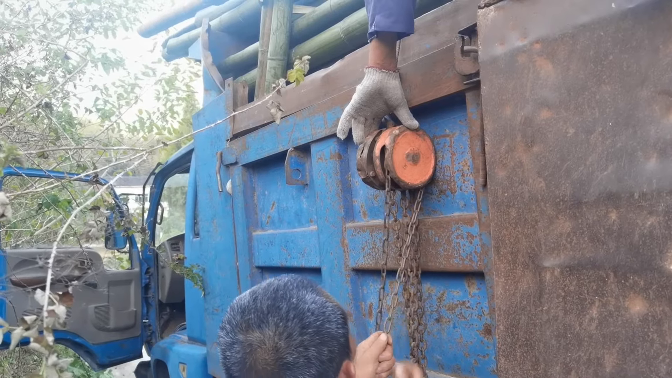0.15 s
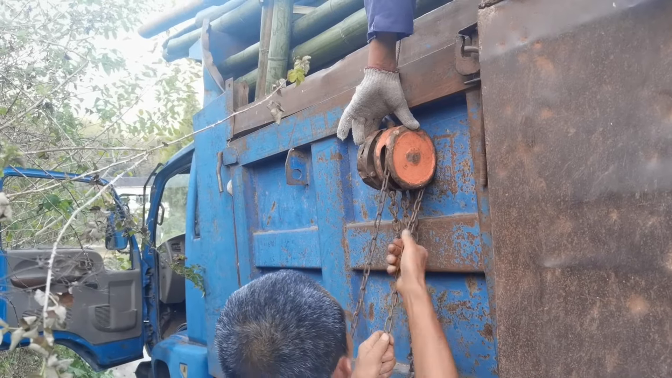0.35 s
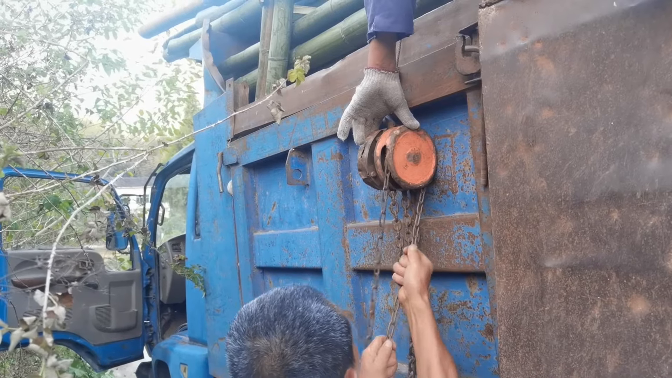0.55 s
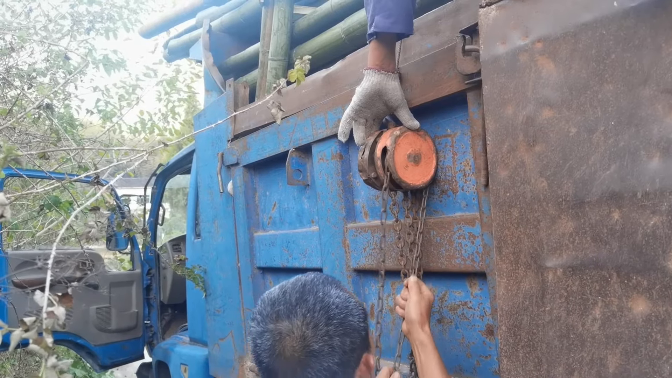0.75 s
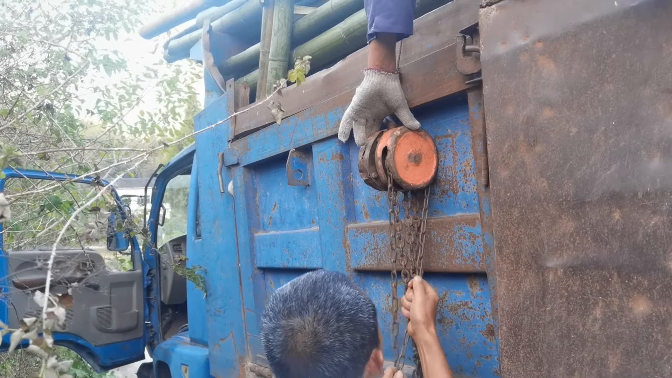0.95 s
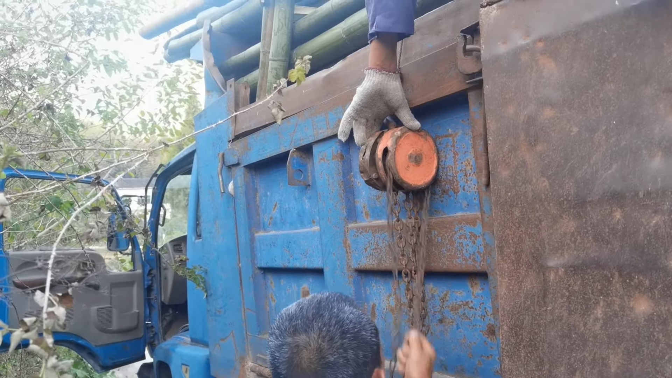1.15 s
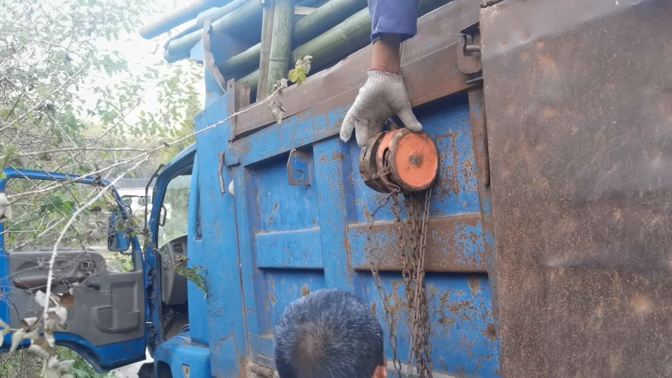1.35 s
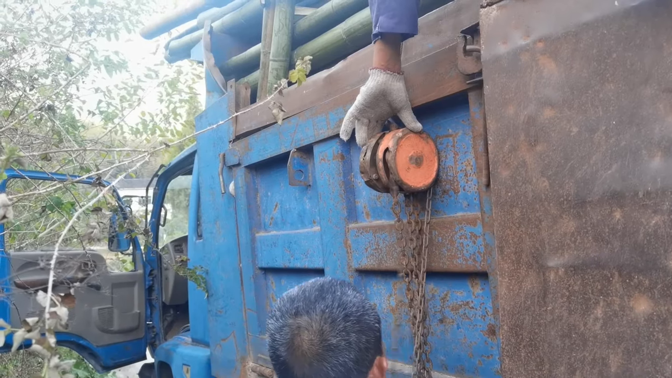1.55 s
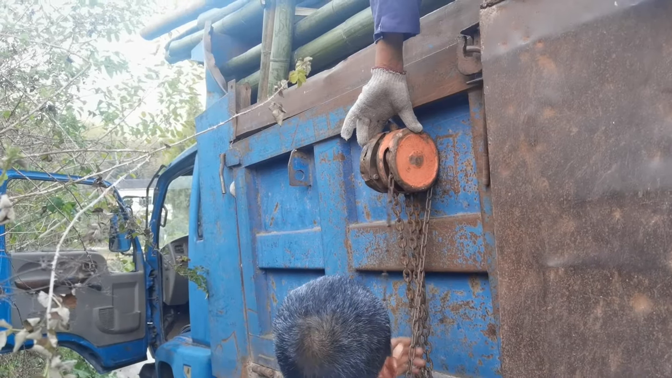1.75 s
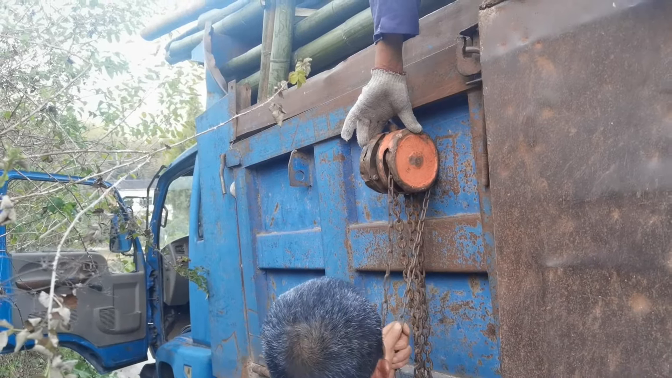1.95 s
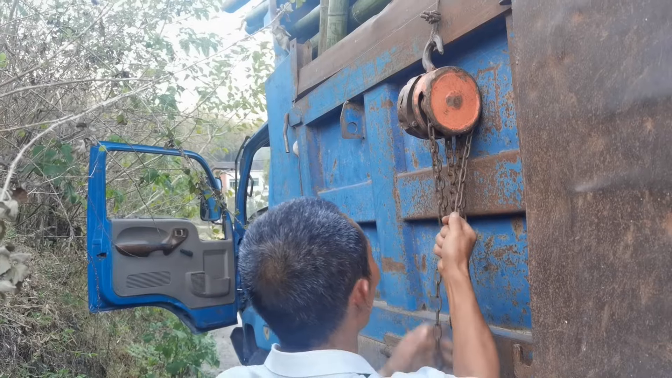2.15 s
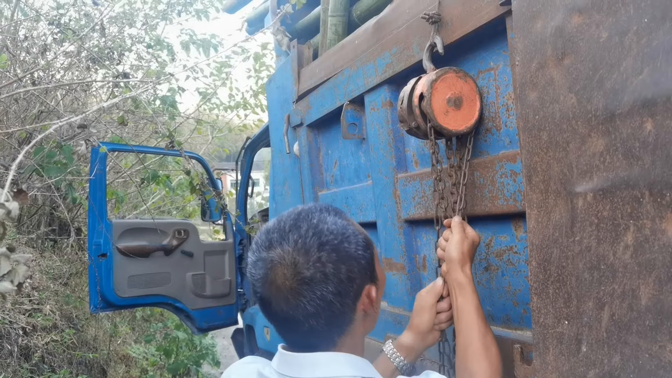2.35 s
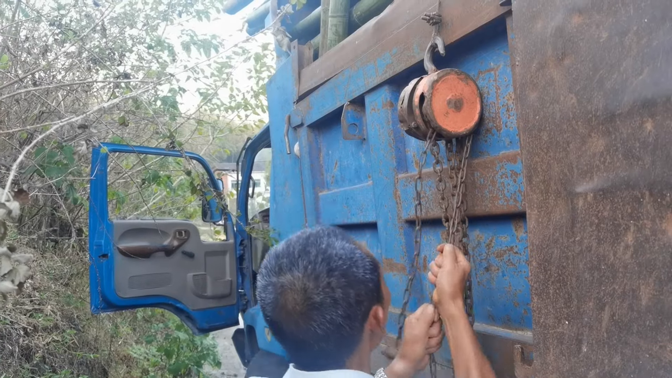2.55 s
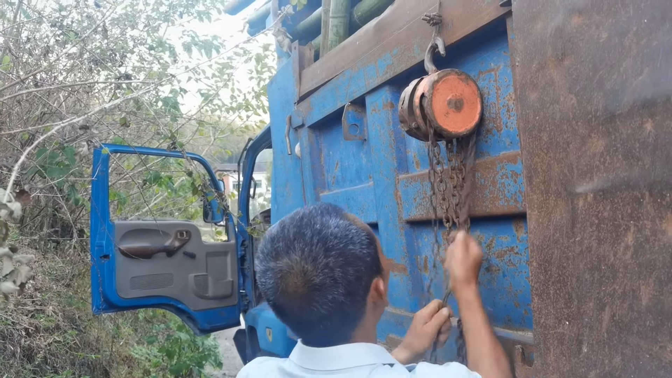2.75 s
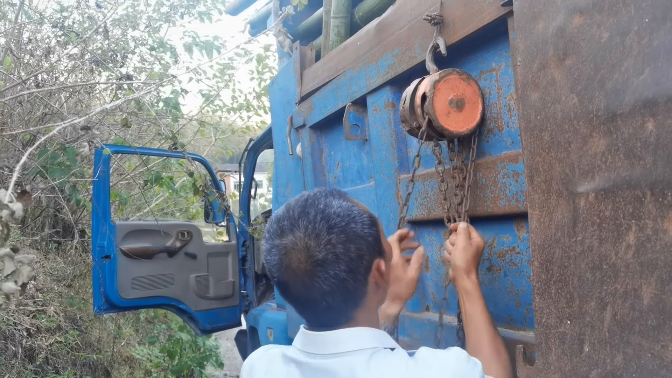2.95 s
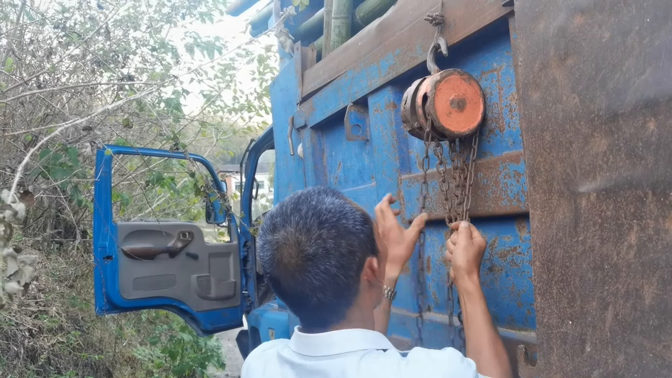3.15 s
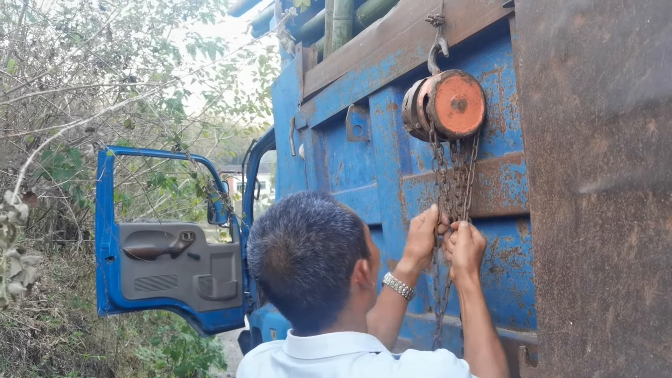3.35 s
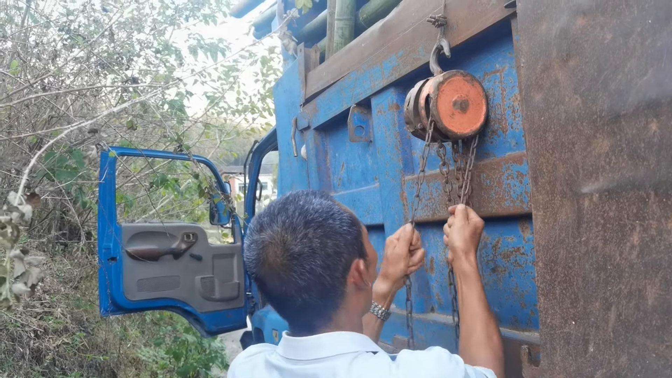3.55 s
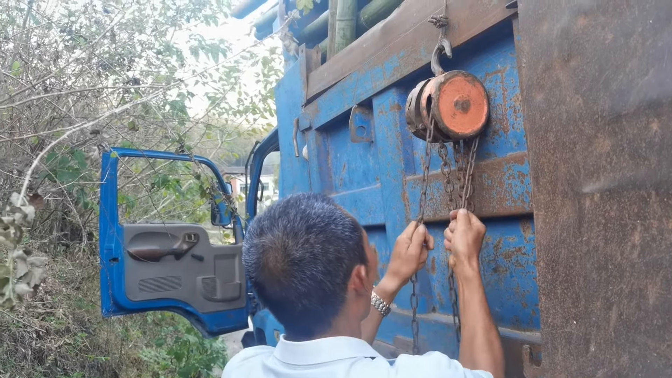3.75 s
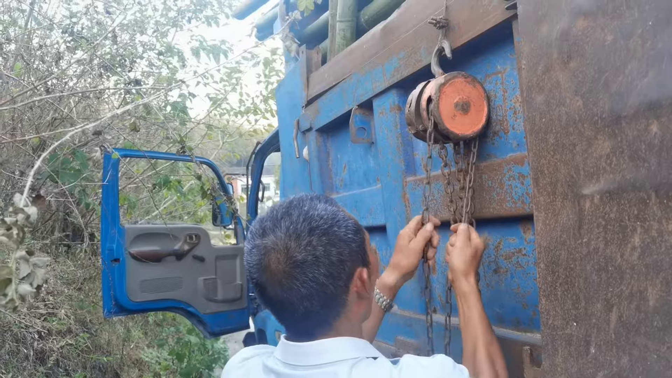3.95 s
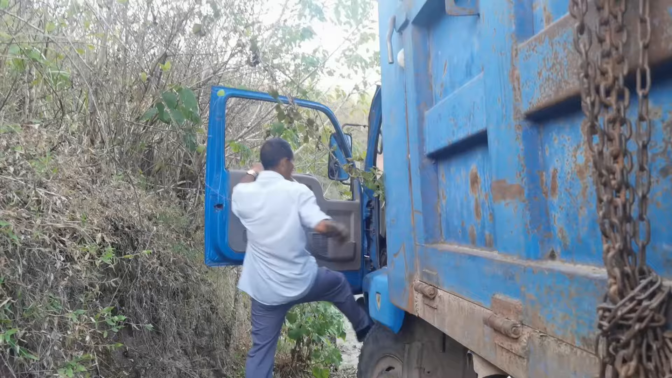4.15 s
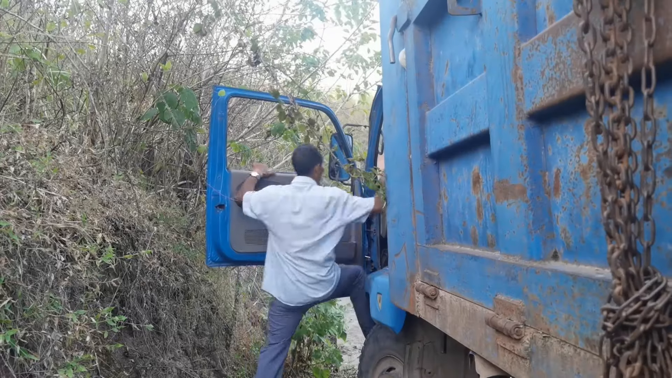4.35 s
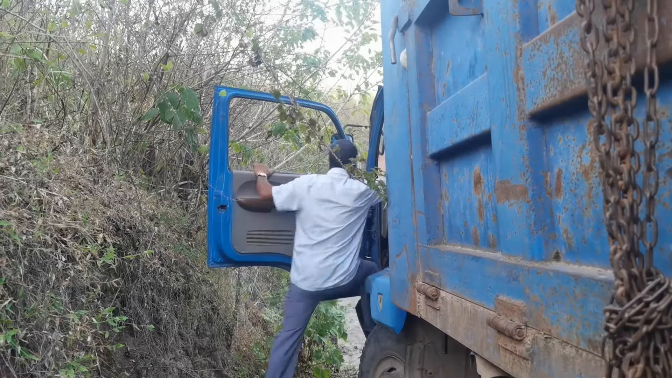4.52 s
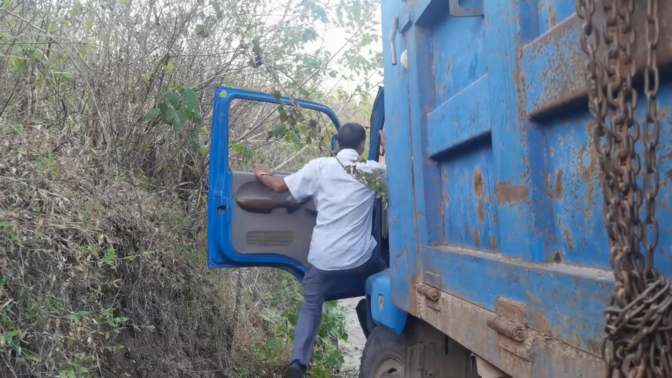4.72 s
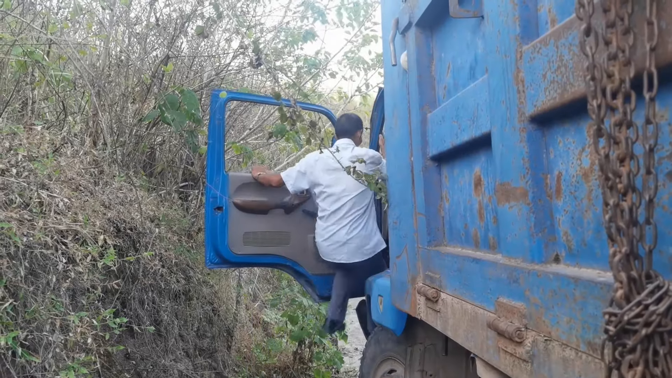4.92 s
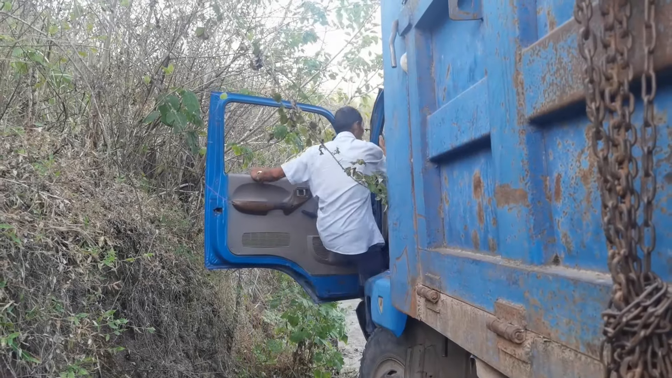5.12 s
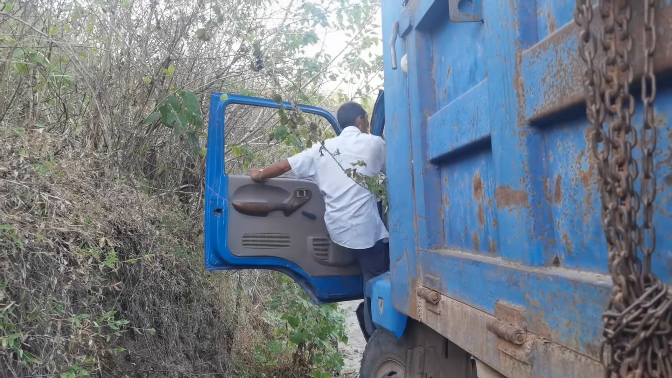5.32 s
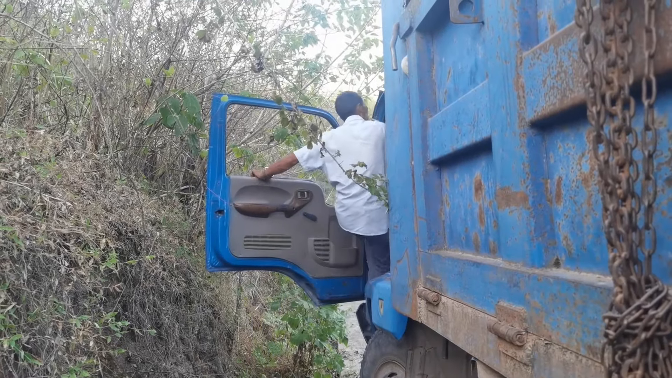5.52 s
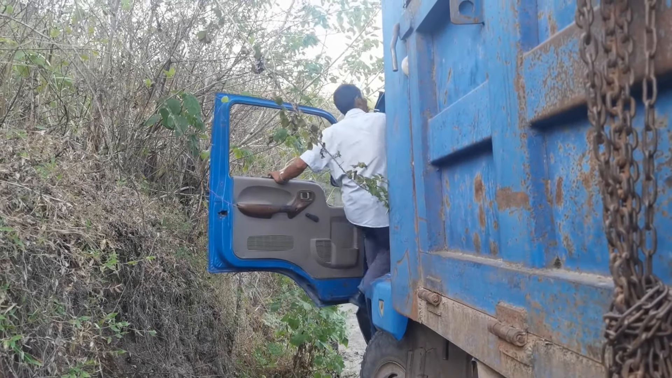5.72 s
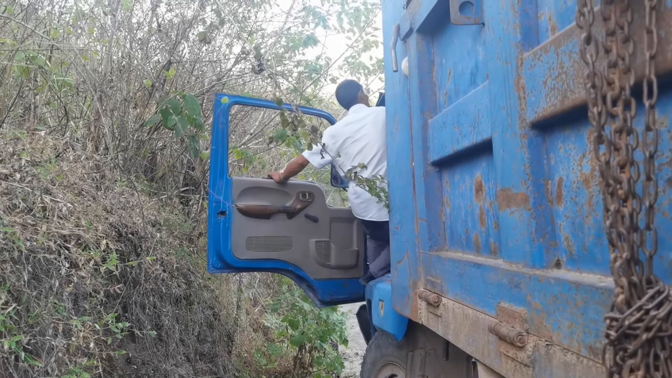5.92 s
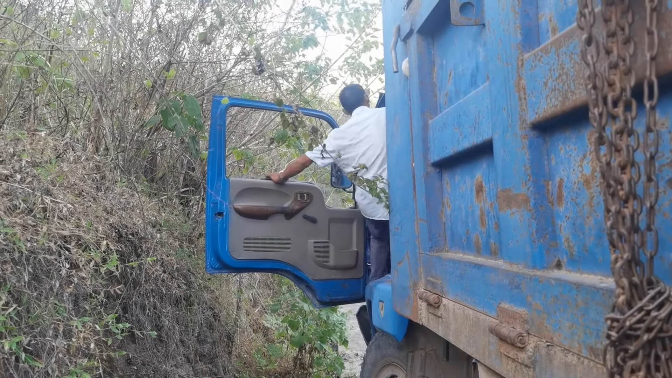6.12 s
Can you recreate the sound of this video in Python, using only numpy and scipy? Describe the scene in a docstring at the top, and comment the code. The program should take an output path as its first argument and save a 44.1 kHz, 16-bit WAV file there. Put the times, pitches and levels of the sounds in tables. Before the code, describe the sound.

Quiet outdoor air with a faint, very thin high hiss until about 4.2 s. Close by, a hand hoist starts nearly still; light link clicks come at 0.3 s, then a sharp bright clank at 0.6. From 1.0 to 1.25 s a dense, loud cascade of steel links rings and chatters, with housing clacks and a low boom from the truck side, trailing off in clinks to 1.5. Smaller clinks follow around 1.7 and 1.9, a strong clank with boom at 2.43, another at 2.74, then a cluster at 3.4 with a clear high link tick, and a last clink near 3.8. Silence at 4.2. From 4.3 a quieter scene: leaves rustle, shoes scuff, soft low thuds on the cab, firmest at 4.57, with a short squeak at 4.5. A thud at 4.8, twig tick at 4.9, raspy chirp at 4.94, faint squeaks at 5.24, then sparse, muted bumps and rustle to about 6.2.

```python
"""A hand chain hoist is hauled in several pulls against the steel side of a truck, in quiet air; a faint, very high
thin hiss runs through the first part. Link contacts ring shared steel modes, the housing clacks in its own and the
side wall booms in low modes. One link tick rings clear and high near the end of the hauling.
After a brief silence a man climbs into the cab through roadside brush: filtered contact noise rustles and scuffs,
cab modes thud, twigs tick, and wavering tones in rasp squeak and chirp."""
import sys
import numpy as np
from scipy import signal
from scipy.fft import rfft, irfft, next_fast_len
from scipy.io import wavfile
from scipy.ndimage import uniform_filter1d

SR = 44100
rng = np.random.default_rng(int(sys.argv[2]) if len(sys.argv) > 2 else 0)


def output_pcm(signal):
    """Save a mono or channel-first signal as 16-bit PCM at the path in sys.argv[1].

    Samples are clipped to [-1, 1] before scaling.
    """
    pcm = np.clip(np.atleast_2d(signal).T, -1, 1) * 32767
    wavfile.write(sys.argv[1], SR, np.round(pcm).astype(np.int16))


N = 272538


def amp(db):
    """dB to amplitude factor."""
    return 10 ** (np.asarray(db) / 20)


def unit(x):
    """Scale to rms 1."""
    return x / np.sqrt(np.mean(x ** 2) + 1e-20)


def along(points, hz):
    """Interpolate (frequency [Hz], value) points on a log frequency axis."""
    f, value = np.transpose(points)
    return np.interp(np.log(hz + 1), np.log(f + 1), value)


def curves(rows):
    """One value per sample for each column after the time [s]."""
    s, *columns = np.transpose(rows)
    return [np.interp(np.arange(N) / SR, s, column) for column in columns]


def add(track, s, sound):
    """Mix a sound into the track at time s."""
    start = max(round(s * SR), 0)
    part = track[:, start:start + sound.shape[-1]]
    part += sound[..., :part.shape[-1]]


def filtered(x, response):
    """Apply a response of frequency, zero-padded."""
    n = x.shape[-1]
    m = next_fast_len(n + n // 4, True)
    spectrum = rfft(x, m) * response(np.fft.rfftfreq(m, 1 / SR))
    return irfft(spectrum, m)[..., :n]


def coloured(x, spectrum):
    """Shape x by (frequency [Hz], level [dB]) points."""
    return filtered(x, lambda hz: amp(along(spectrum, hz)))


def resonances(modes, f, scatter_db=0):
    """Causal response of (frequency [Hz], width [Hz], level [dB]) modes, signs alternating, strengths scattered."""
    total = 0
    for k, (centre, width, db) in enumerate(modes):
        strength = (-1) ** k * amp(db + scatter_db * rng.standard_normal())
        damping = 1j * f * width
        total = total + strength * damping / (centre * centre - f * f + damping)
    return total


def noise():
    """White noise, two unrelated channels."""
    return rng.standard_normal((2, N))


def stereo(pair, alike):
    """Turn two unrelated signals into left and right with a given likeness, at rms 1."""
    def mid_side(hz):
        turn = np.arccos(np.clip(along(alike, hz), -1, 1)) / 2
        return np.array([np.cos(turn), np.sin(turn)])

    mid, side = filtered(pair, mid_side)
    return unit(np.array([mid + side, mid - side]))


def contacts(rate_hz, spread_db, t30_s):
    """Rms-1 envelope of random small contacts; each one's energy falls 30 dB in t30_s."""
    hits = rng.random(N) < rate_hz / SR
    energy = hits * amp(spread_db * np.clip(rng.standard_normal(N), -2, 2)) ** 2
    t = np.arange(SR // 4) / SR
    energy_fall = 10 ** (-3 * t / t30_s)
    return unit(np.sqrt(np.abs(signal.fftconvolve(energy, energy_fall)[:N])))


def patchy(x, depth_db):
    """Shift the colour from moment to moment as the points of contact change."""
    z = signal.stft(x, nperseg=512)[2]
    field = uniform_filter1d(rng.standard_normal(z.shape[1:]), size=3, axis=0)
    field = uniform_filter1d(field, size=8, axis=1)
    return signal.istft(z * amp(depth_db * unit(field)), nperseg=512)[1][:, :N]


def strokes(starts, lengths, levels_db, shape):
    """Envelope of strokes added in power: each swells, holds, falls away and lingers faintly."""
    delay_s, attack_t60_s, release_t60_s, linger_db, linger_t60_s = shape
    t, power = np.arange(0, N, 32) / SR, 0
    for s, length, db in zip(starts, lengths, levels_db):
        before = np.maximum(s + delay_s - t, 0)
        after = np.maximum(t - s - delay_s - length, 0)
        release = amp(-60 * after / release_t60_s)
        linger = amp(linger_db - 60 * after / linger_t60_s)
        power = power + (amp(db - 60 * before / attack_t60_s) * np.maximum(release, linger)) ** 2
    return np.interp(np.arange(N) / SR, t, np.sqrt(power))


# outdoor air: (frequency [Hz], relative level [dB])
AIR_SPECTRUM = [(25, -24.5), (60, -2.5), (170, -11.5), (400, -17), (700, -12), (1500, -28), (3200, -27),
                (6000, -23), (10000, -20), (13000, -41.5), (16000, -39.5)]
# faint, very high thin hiss: (frequency [Hz], relative level [dB])
HISS_SPECTRUM = [(13500, -47), (14700, -22), (15200, -1), (15600, -16), (16000, -17.5)]
# air and cab: (frequency [Hz], left-right likeness [-1 to 1])
FAR_LIKENESS = [(100, 1), (300, 0.94), (650, 0.25), (1400, 0), (3000, 0.6), (12000, 0)]


def background(first_part, air_db=-69, hiss_db=-56):
    """Quiet outdoor air as filtered noise; a faint, very high thin hiss runs through the first part."""
    air = amp(air_db) * stereo(coloured(noise(), AIR_SPECTRUM), FAR_LIKENESS)
    waver = contacts(rate_hz=30, spread_db=3, t30_s=.4)
    hiss = amp(hiss_db) * waver * unit(coloured(noise(), HISS_SPECTRUM))
    return air + first_part * hiss * amp([[2], [-2]])


# chain pulls: (time [s], length [s], link jingle relative level [dB], housing clatter relative level [dB])
CHAIN_PULLS = [(0.0, 0.015, -49, -59), (0.556, 0.032, -31.5, -37.5), (1.008, .05, -34, -54),
               (1.082, .15, -19.5, -26.5), (1.572, 0.03, -40, -52), (1.896, 0.012, -44, -58.5),
               (1.99, 0.022, -53, -57), (2.147, 0.44, -64.5, -63.5), (2.417, 0.055, -25, -34),
               (2.743, 0.021, -31.5, -41), (3.437, 0.024, -38, -39), (3.772, 0.03, -46.5, -36.5)]
# envelopes: (delay [s], attack t60 [s], release t60 [s], lingering share [dB], lingering t60 [s])
JINGLE_ENVELOPE = (0, 0.1356, 0.2274, -23, 1.84)
CLATTER_ENVELOPE = (0.05, 0.3567, 0.2264, -20, 1.52)
# modes of links, then of hoist housing: (frequency [Hz], width [Hz], relative level [dB])
LINK_MODES = [(2248, 78, -10), (2920, 150, -14), (3310, 77, -12.5), (4250, 97, -5), (4640, 46, -1.5),
              (5284, 100, 3.5), (5630, 80, 0.5), (6042, 70, 6), (6800, 120, -10.5), (8235, 160, -1.5),
              (10020, 46, -14.5)]
HOUSING_MODES = [(564, 64, -6.5), (672.4, 62, 3.5), (804, 100, -3.5), (892.4, 36, 0), (1013, 37, -4.5),
                 (1223, 110, -9), (1405, 57, -5), (1866, 33, -9.5), (2087, 62, -16.5), (2766, 80, -11),
                 (3357, 66, -16)]
# bare crack of steel on steel: (frequency [Hz], relative level [dB])
CRACK_SPECTRUM = [(300, -33), (1200, -0.5), (2000, 2), (3500, 1.5), (5500, 3), (8400, 2), (9400, -10),
                  (11000, -10.5), (12000, -22), (14600, -10.5), (15400, -21.5)]
# hoist: (frequency [Hz], left-right likeness [-1 to 1])
NEAR_LIKENESS = [(100, .97), (300, .94), (600, .9), (1200, .65), (2200, .25), (5000, .5), (12000, .4)]


def running_chain(jingle_db=1, clatter_db=0, crack_db=-8):
    """Many lesser link contacts during a pull ring chain and housing together."""
    s, length, jingle, clatter = np.transpose(CHAIN_PULLS)
    touches = stereo(noise(), NEAR_LIKENESS) * contacts(rate_hz=650, spread_db=2.5, t30_s=.02)
    links = filtered(touches, lambda f: resonances(LINK_MODES, f) + amp(crack_db + along(CRACK_SPECTRUM, f)))
    links = unit(patchy(links, depth_db=4.0))
    housing = unit(filtered(touches, lambda f: resonances(HOUSING_MODES, f)))
    jingle_level = strokes(s, length, jingle + jingle_db, JINGLE_ENVELOPE)
    clatter_level = strokes(s, length, clatter + clatter_db, CLATTER_ENVELOPE)
    return jingle_level * links + clatter_level * housing


# jolts of the hoist against the side wall: (time [s], level [dB])
WALL_JOLTS = [(0.0, -53.5), (0.59, -37.5), (0.987, -35.5), (1.11, -22.5), (1.191, -24.5), (1.24, -26),
              (1.47, -49.5), (1.67, -49), (1.95, -51.5), (2.334, -46), (2.439, -26.5), (2.74, -34.5),
              (2.81, -37), (3.439, -39.5), (3.48, -42), (3.554, -33.5), (3.79, -35)]
# envelope: (delay [s], attack t60 [s], release t60 [s], lingering share [dB], lingering t60 [s])
BOOM_ENVELOPE = (0, .05, .4, -12, 1.4)
# side wall modes: (frequency [Hz], width [Hz], relative level [dB])
WALL_MODES = [(58, 29, -13.5), (80.5, 9, -2), (111, 20, -1), (144, 21, 4), (175, 16, 2.5), (202.2, 22, -1),
              (275.4, 29, -3), (331, 40, -7.5), (401.3, 110, -11.5)]


def side_wall(wall_db=0, stir_db=-67, settle_s=0.015, jolt_s=.025):
    """Noise-driven low modes of the steel panel, levelled: a faint stir, and a boom at each jolt of the hoist."""
    s, boom = np.transpose(WALL_JOLTS)
    ring = filtered(stereo(noise(), NEAR_LIKENESS), lambda f: resonances(WALL_MODES, f))
    power = uniform_filter1d(np.mean(ring ** 2, axis=0), int(settle_s * SR))
    swell = np.sqrt(np.abs(power) + 1e-12)
    boom_level = strokes(s, np.full(len(s), jolt_s), boom + wall_db, BOOM_ENVELOPE)
    return np.hypot(amp(stir_db), boom_level) * ring / swell


def link_ring(x, note_hz, tilt_db, crack_db=-18, own_db=-4, note_db=-1, note_width_hz=110,
              own_width_hz=60, scatter_db=3.5, count=26):
    """Links share main modes; each blow adds its note, lesser random modes, a crack and a tilt [dB/octave]."""
    stretch = np.exp(.005 * rng.standard_normal())
    own = [(hz, own_width_hz, own_db + along(CRACK_SPECTRUM, hz))
           for hz in np.sort(rng.uniform(2300, 14000, count))]

    def response(f):
        tilt = amp(tilt_db * np.log2(np.clip(f, 1000, 12000) / 5000))
        body = resonances(LINK_MODES, f * stretch, scatter_db) + resonances(own, f, scatter_db)
        body = body + amp(crack_db + along(CRACK_SPECTRUM, f))
        return tilt * body + 1j * resonances([(note_hz, note_width_hz, note_db)], f)

    return filtered(x, response)


# link blows: (time [s], link relative level [dB], housing clack relative level [dB], link note [Hz])
LINK_BLOWS = [(0.3426, -31.5, -49.5, 6020), (0.4219, -41, -56.5, 5500), (0.5546, -21, -29.5, 6360),
              (0.5945, -5, -31, 5360), (0.6344, -21.5, -47.5, 6040), (0.7078, -31.5, -55, 5600),
              (0.7482, -39.5, -51.5, 2790), (0.8154, -50, -52, 2780), (0.8634, -44.5, -47, 3285),
              (0.9284, -68, -50, 7170), (0.9784, -21.5, -40, 6920), (0.9986, -17, -38.5, 5490),
              (1.0585, -6, -27.5, 8090), (1.0794, -6, -23, 5400), (1.0974, -5, -20.5, 5330),
              (1.1164, -6, -19, 6010), (1.1314, -9, -27.5, 5390), (1.1593, -4, -20.5, 6020),
              (1.1864, -6, -18.5, 6000), (1.2064, -5, -22.5, 8140), (1.2254, -10.5, -23.5, 6040),
              (1.2684, -19.5, -42, 5430), (1.3079, -21.5, -38.5, 5410), (1.3783, -29.5, -42, 5390),
              (1.4207, -17, -38, 6240), (1.4641, -12, -32.5, 5360), (1.6322, -27.5, -43.5, 6840),
              (1.6691, -18.5, -37, 6850), (1.6864, -23, -40.5, 7000), (1.7579, -27.5, -45.5, 6120),
              (1.8264, -42.5, -53, 5380), (1.8841, -31.5, -45, 2810), (1.916, -24, -45.5, 6260),
              (1.9719, -31, -68, 4830), (2.0722, -43.5, -55, 3270), (2.2937, -45, -43, 3200),
              (2.4204, -6.5, -29, 6350), (2.4384, -14.5, -27, 5175), (2.4603, -25, -30, 8370),
              (2.4956, -27, -34.5, 5450), (2.6663, -25.5, -47, 3260), (2.7337, -17, -32, 5400),
              (2.7437, -15.5, -31.5, 6230), (2.8559, -33.5, -51.5, 3310), (2.9352, -30, -42.5, 3220),
              (3.039, -41.5, -48.5, 2480), (3.1577, -32, -49, 3530), (3.4116, -18, -46, 4580),
              (3.4371, -16, -38, 5510), (3.4496, -13, -33.5, 6720), (3.4694, -17, -39.5, 3250),
              (3.5259, -32, -68, 5350), (3.5998, -54, -49.5, 2700), (3.7908, -19.5, -38.5, 5580),
              (3.8594, -40, -46, 3280), (3.8761, -36, -63, 6260), (4.0452, -32, -47.5, 6140)]
# harder blows are brighter: dB per octave for each dB above a plain blow
BRIGHTEN, PLAIN_DB = .2, -20.5


def clanks(link_db=-9, clack_db=-1, tail_db=-29, tail_t60_s=0.28, snap_db=2.0, snap_t60_s=0.0043,
           chatter_t60_s=0.083, slide_db=-25, clack_t60_s=0.11, kick_db=6, lag_s=0.001):
    """A link slides, snaps into its pocket and chatters; the housing modes answer a moment later."""
    links, clacks = np.zeros((2, N)), np.zeros((2, N))
    t = np.arange(-SR // 30, SR // 5) / SR

    def fade(t60_s):
        return (t >= 0) * amp(-60 * np.abs(t) / t60_s)

    def early_rms(x, window_s):
        return np.sqrt(np.mean(x[:, (t >= 0) & (t < window_s)] ** 2))

    slide = (t < 0) * (1 - t / t[0]) ** 2  # friction swells up to the blow
    around = amp(tail_db) * fade(tail_t60_s) + amp(slide_db) * slide
    hiss = stereo(noise(), NEAR_LIKENESS)
    bounces = contacts(rate_hz=1000, spread_db=3.5, t30_s=.009)
    for s, db, housing_db, note_hz in LINK_BLOWS:
        part = rng.integers(N - len(t)) + np.arange(len(t))
        snap = fade(snap_t60_s)
        blow = hiss[:, part] * (amp(snap_db) * snap + bounces[part] * fade(chatter_t60_s) + around)
        ring = link_ring(blow, note_hz, tilt_db=BRIGHTEN * (db - PLAIN_DB))
        add(links, s + t[0], amp(db + link_db) * ring / early_rms(ring, .012))
        push = hiss[:, part] * (amp(kick_db) * snap + fade(clack_t60_s) + around)
        knock = filtered(push, lambda f: resonances(HOUSING_MODES, f, scatter_db=4))
        add(clacks, s + t[0] + lag_s, amp(housing_db + clack_db) * knock / early_rms(knock, .025))
    return links + clacks


# first row a high link tick, the rest squeaks and chirps:
# (time of peak [s], level [dB], pitch [Hz], half length [s], rasp share [0-1])
TICK_AND_SQUEAKS = [(3.41, -35, 4620, 0.007, .55), (4.503, -31, 1741, 0.012, .03),
                    (4.94, -23, 3860, 0.016, 0.6), (5.01, -53, 1170, 0.02, 0.2),
                    (5.236, -45, 3450, 0.017, 0.6), (5.24, -51, 4030, 0.018, 0.3),
                    (5.255, -53, 1276, 0.023, .2)]
# rasp: (frequency [Hz], relative level [dB])
RASP_SPECTRUM = [(2500, -23), (3700, -4), (4800, -5.5), (6000, 1), (7000, -7), (8000, -10), (10000, -13.5),
                 (11000, -14), (15000, -26)]


def tick_and_squeaks(waver=0.017, overtone_db=-17):
    """Link tick, squeaks and chirps: a wavering tone with one overtone swells and fades in filtered-noise rasp."""
    out, t = np.zeros((2, N)), np.arange(-SR // 10, SR // 10) / SR
    for s, db, hz, half_s, rasp in TICK_AND_SQUEAKS:
        jitter = unit(uniform_filter1d(rng.standard_normal(len(t)), size=60))
        pitch_hz = hz * (1 + waver * np.sqrt(rasp) * jitter)
        phase = 2 * np.pi * np.cumsum(pitch_hz) / SR + np.array([[.5], [-.5]])
        tone = unit(np.sin(phase) + amp(overtone_db) * np.sin(2 * phase))
        scrape = unit(coloured(rng.standard_normal((2, len(t))), RASP_SPECTRUM))
        mix = np.sqrt(1 - rasp) * tone + np.sqrt(rasp) * scrape
        add(out, s + t[0], amp(db) * mix / np.cosh(1.62 * t / half_s))
    return out


# leaves against the shirt, stepping up then ducking in: two lists of (time [s], relative level [dB])
LEAF_LEVELS = [
    [(4.29, -52), (4.33, -41.5), (4.428, -47), (4.462, -43), (4.476, -45), (4.512, -38), (4.74, -52),
     (4.89, -50.5)],
    [(4.99, -50.5), (5.072, -56), (5.238, -50), (5.356, -66), (5.616, -49), (6.092, -63.5), (6.152, -52),
     (6.18, -67)],
]
# weight shifts: (time [s], length [s], shoe scuff level [dB], cab rumble level [dB])
WEIGHT_SHIFTS = [(4.32, 0.16, -43.5, -41.5), (4.488, 0.11, -45, -44.5), (4.806, 0.013, -52.5, -41.5),
                 (4.956, 0.085, -55, -58.5), (5.243, 0.068, -50.5, -53), (5.495, 0.1, -53.5, -47),
                 (5.72, 0.0335, -52.5, -50.5), (5.837, 0.088, -59, -54), (6.158, 0.031, -59, -55)]
# envelope: (delay [s], attack t60 [s], release t60 [s], lingering share [dB], lingering t60 [s])
SHIFT_ENVELOPE = (0, 0.42, 0.03, -9, 1.3)
# brush, shoe scuff, cab rumble: (frequency [Hz], relative level [dB])
BRUSH_SPECTRUM = [(880, -78), (1500, -6), (2370, -4.5), (4080, -3.5), (6060, 3), (7320, -3), (8740, -3.5),
                  (12000, -18), (13400, -22), (16000, -28.5)]
SCUFF_SPECTRUM = [(300, -6.5), (650, 3.5), (1100, 4), (1500, -2.5), (2200, -0.5), (3500, -10.5),
                  (6000, -18)]
RUMBLE_SPECTRUM = [(15, -42), (25, -16), (49, 5), (100, -3.5), (150, 2.5), (227, 0.5), (267, -3), (325, 0),
                   (460, -10.5), (600, -8.5), (780, -18), (1320, -120)]


def climbing(brush_db=2, scuff_db=0, rumble_db=0):
    """Leaves brush the shirt as contact noise; each shift of weight scuffs the shoes and rumbles the cab."""
    brush, = curves(np.vstack(LEAF_LEVELS))
    s, length, scuff, rumble = np.transpose(WEIGHT_SHIFTS)
    leaves = patchy(noise() * contacts(rate_hz=900, spread_db=2, t30_s=.025), depth_db=1.2)
    shoes = patchy(noise() * contacts(rate_hz=500, spread_db=2, t30_s=.06), depth_db=2.5)
    scuff_level = strokes(s, length, scuff + scuff_db, SHIFT_ENVELOPE)
    rumble_level = strokes(s, length, rumble + rumble_db, SHIFT_ENVELOPE)
    layers = [(amp(brush + brush_db), leaves, BRUSH_SPECTRUM),
              (scuff_level, shoes, SCUFF_SPECTRUM),
              (rumble_level, noise(), RUMBLE_SPECTRUM)]
    return sum(level * stereo(coloured(grain, spectrum), FAR_LIKENESS) for level, grain, spectrum in layers)


# feet and body against the cab: (time [s], level [dB], frequency driven most [Hz])
CAB_THUDS = [(4.302, -41.5, 125), (4.322, -33, 62.6), (4.428, -34.5, 323), (4.57, -25, 480),
             (4.596, -26.5, 156), (4.772, -37, 880), (4.790, -40, 760), (4.797, -31.5, 56.4),
             (4.870, -50, 860), (5.295, -46.5, 652), (5.319, -44.5, 59), (5.384, -45.5, 58),
             (5.478, -36, 720), (5.484, -41, 162), (5.847, -47, 333), (6.153, -43.5, 110)]
# cab modes: (frequency [Hz], relative level [dB], t60 [s])
CAB_MODES = [(58.2, 3.5, 0.34), (84.5, 14, 0.11), (122.5, -10.5, 0.46), (152.7, 1, 0.24), (259.5, 4, 0.16),
             (340, 3.5, 0.11), (474, 4.5, 0.057), (589, 1, 0.14), (813, -1.5, 0.072), (862, 0.5, 0.043),
             (1120, -12, 0.17), (1300, 2, 0.063)]


def thuds(octaves=0.44, rise_cycles=0.66, puff_db=-9, puff_t60_s=0.25):
    """Soft contacts wake low cab modes slowly, hard ones higher modes faster; each adds a puff of noise."""
    out, t = np.zeros((2, N)), np.arange(SR // 2) / SR
    for s, db, centre_hz in CAB_THUDS:
        def drive(f):
            return np.exp(-.5 * (np.log2((f + 1) / centre_hz) / octaves) ** 2)

        ring = 0
        for hz, level, t60_s in CAB_MODES:
            mode = np.sin(2 * np.pi * (hz * t + rng.random()))
            ring = ring + drive(hz) * amp(level - 60 * t / t60_s) * mode
        puff = stereo(filtered(rng.standard_normal((2, len(t))), drive), FAR_LIKENESS)
        puff = puff * amp(puff_db - 60 * t / puff_t60_s)
        rise = 1 - np.exp(-t * centre_hz / rise_cycles)
        add(out, s, amp(db) * (ring + puff) * rise)
    return out


# twig snaps: (time [s], relative level [dB])
TWIG_SNAPS = [(4.46, -25), (4.9033, -24), (5.8855, -28)]


def twigs(snap_db=-5, t60_s=0.0089):
    """Dry twigs tick as he pushes past: fast-fading bursts of brush-coloured noise."""
    out, t = np.zeros((2, N)), np.arange(SR // 20) / SR
    for s, db in TWIG_SNAPS:
        burst = unit(coloured(rng.standard_normal((2, len(t))), BRUSH_SPECTRUM))
        add(out, s, amp(db + snap_db - 60 * t / t60_s) * burst)
    return out


# left port behind the right: (frequency [Hz], phase lag [rad])
LEFT_LAG = [(100, .02), (500, .15), (900, 0.52), (1400, 1.2), (3000, 1.6), (6000, 2.4), (12000, 0.77)]
# hoist, left over right: (frequency [Hz], level difference [dB])
HOIST_LEAN = [(150, -0.5), (700, 1.5), (1300, 1), (2400, 3.5), (4400, 1.5), (9000, 0.5), (14000, 3.5)]


def scene():
    """First the hoist is worked, then the man climbs into the cab."""
    first_part = np.arange(N) / SR < 4.22

    def ports(f):
        # the left port lags the right by a phase that varies with frequency
        lag = np.exp(-1j * along(LEFT_LAG, f) * np.array([[1], [0]]))
        return lag * amp(along(HOIST_LEAN, f) * np.array([[.5], [-.5]]))

    hoist = filtered(running_chain() + side_wall() + clanks(), ports)
    cab = (climbing() + thuds() + twigs()) * amp([[.5], [-.5]])
    return np.where(first_part, hoist, cab) + tick_and_squeaks() + background(first_part)


# silence between hoist and cab: (time [s], level [dB])
PAUSE_LEVELS = [(4.178, 0), (4.186, -60), (4.25, -60), (4.275, -14), (4.315, 0)]
TOP_HZ = 15800


def record(dry):
    """A brief silence parts the two scenes; high peaks are rounded and nothing is kept from TOP_HZ up."""
    pause_db, = curves(PAUSE_LEVELS)
    x = dry * amp(pause_db)
    rounded = x / (1 + np.abs(x / .85) ** 6) ** (1 / 6)
    return filtered(rounded, lambda hz: hz < TOP_HZ)


dry = scene()
out = record(dry)
output_pcm(out)
```